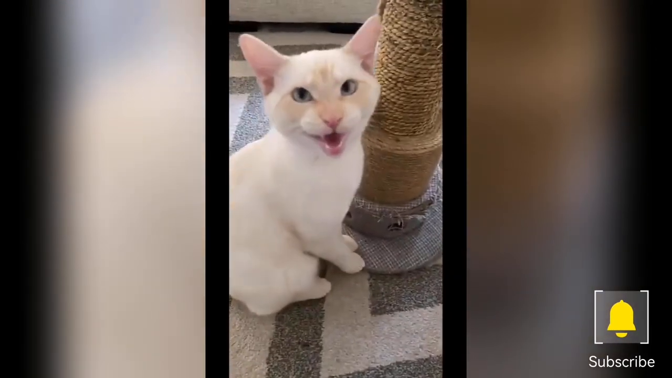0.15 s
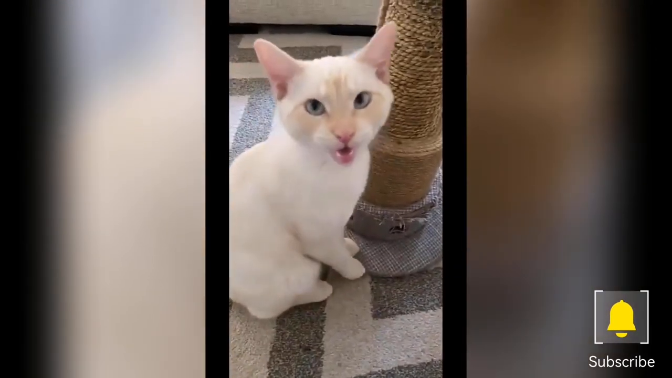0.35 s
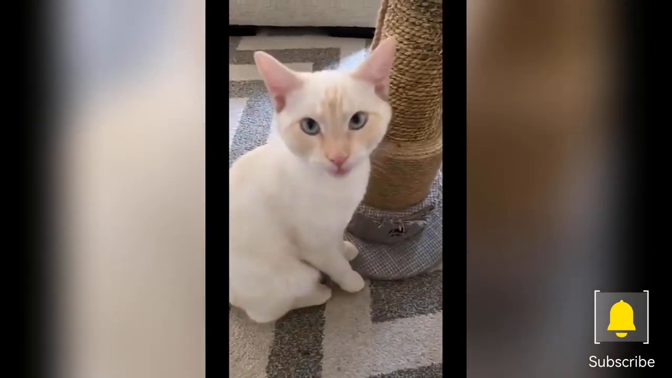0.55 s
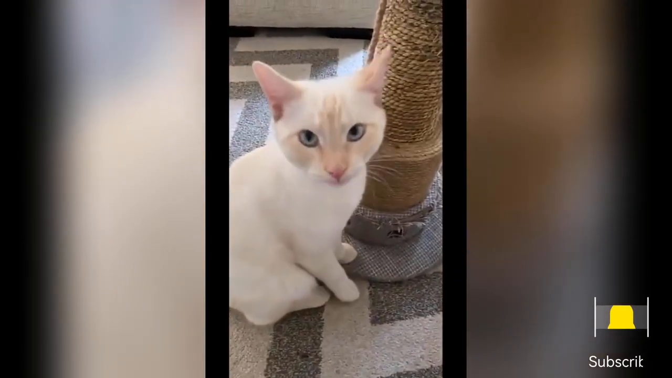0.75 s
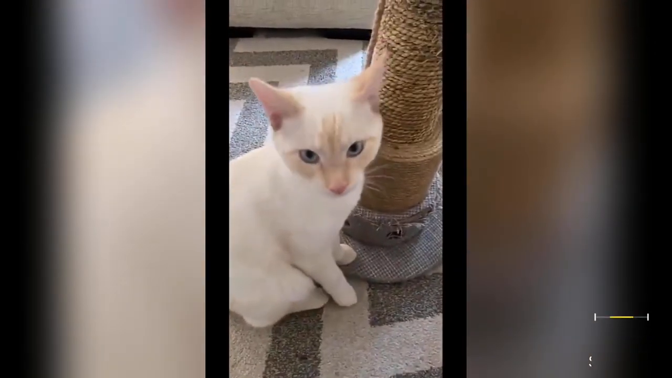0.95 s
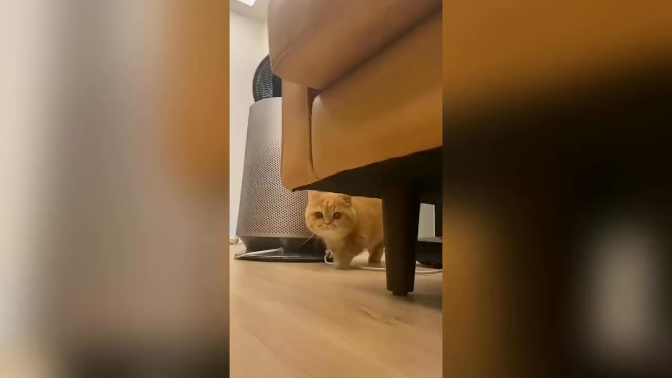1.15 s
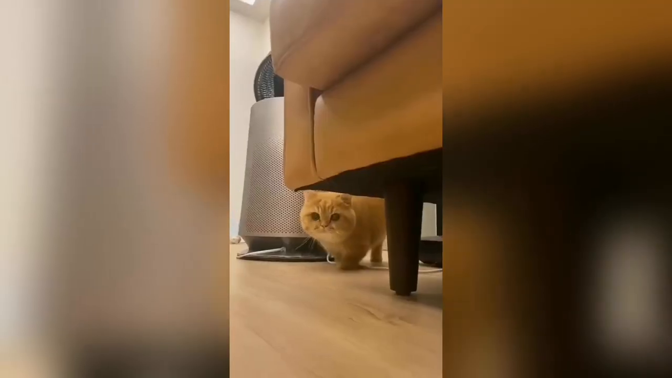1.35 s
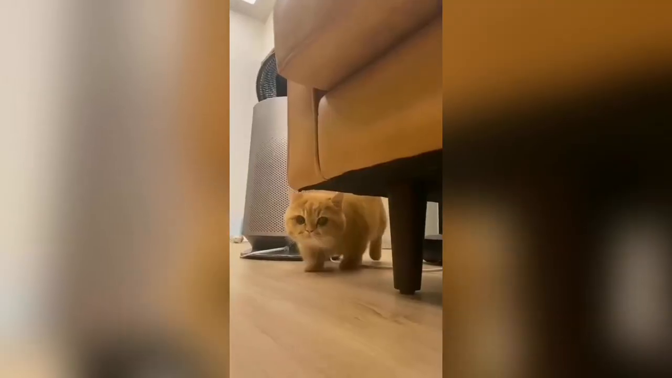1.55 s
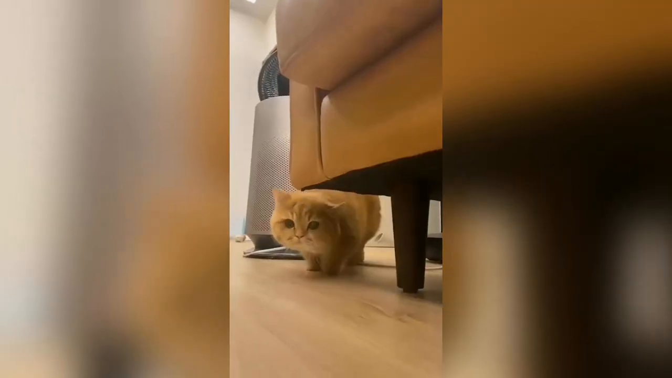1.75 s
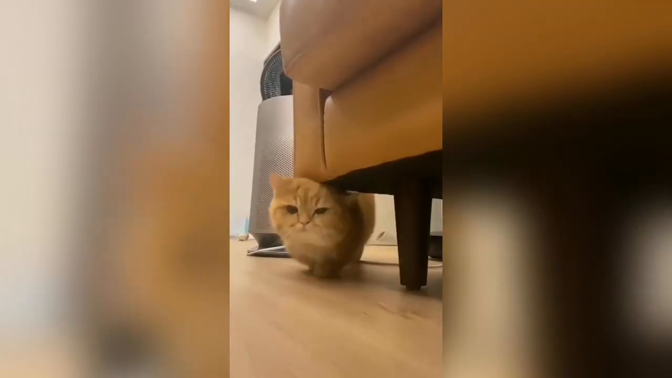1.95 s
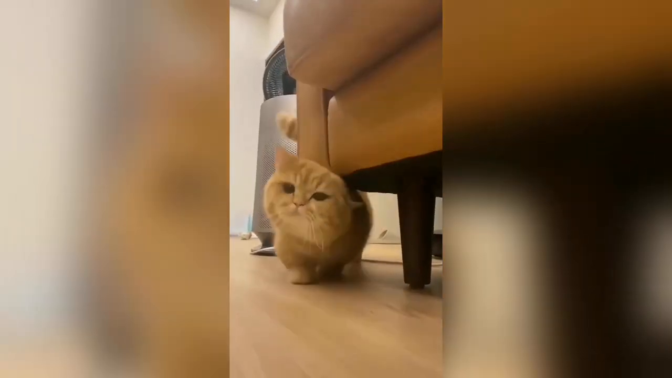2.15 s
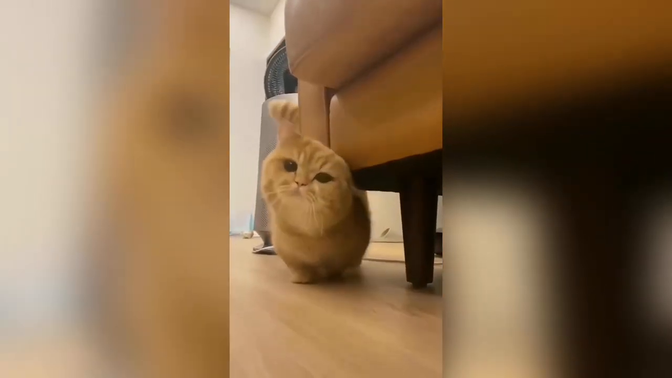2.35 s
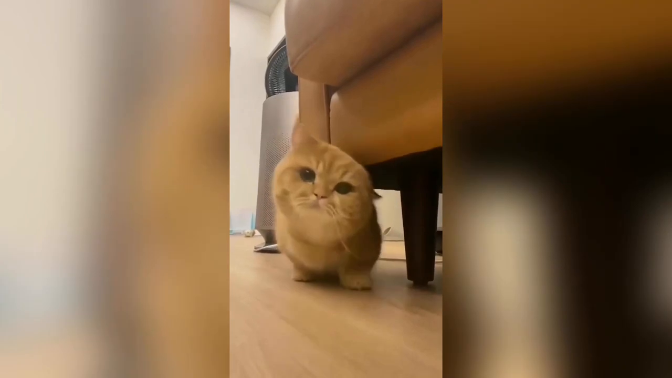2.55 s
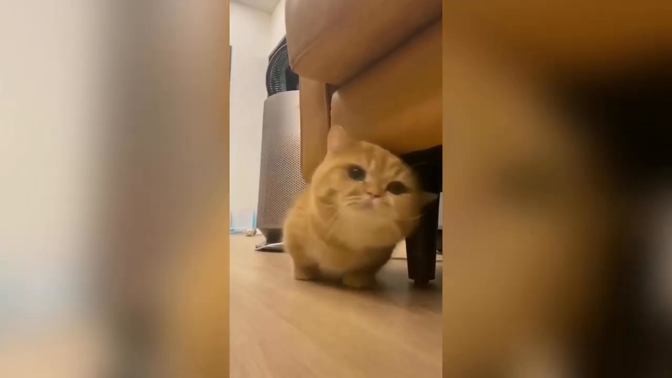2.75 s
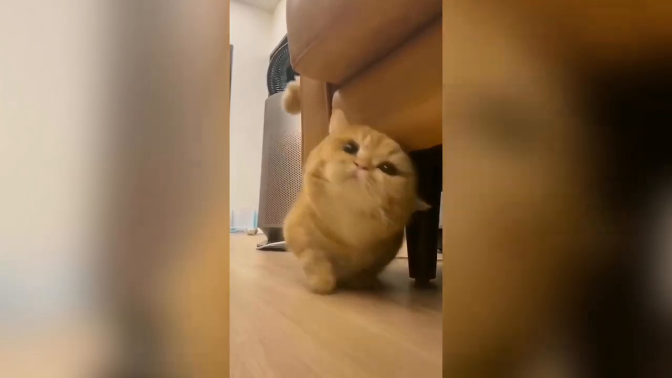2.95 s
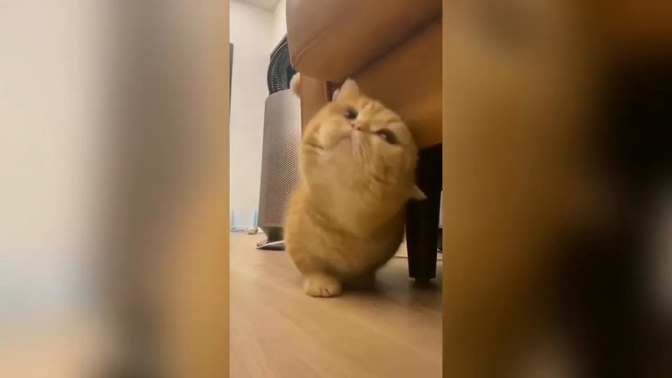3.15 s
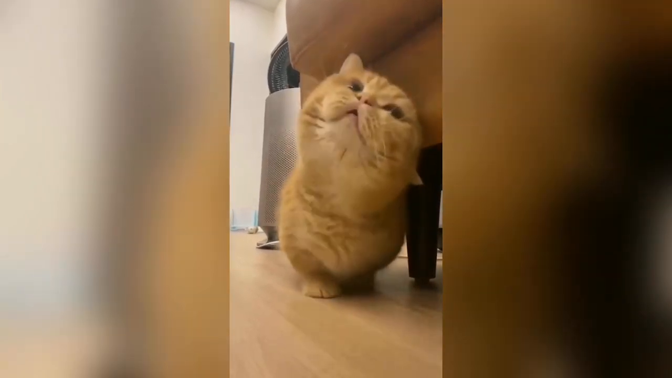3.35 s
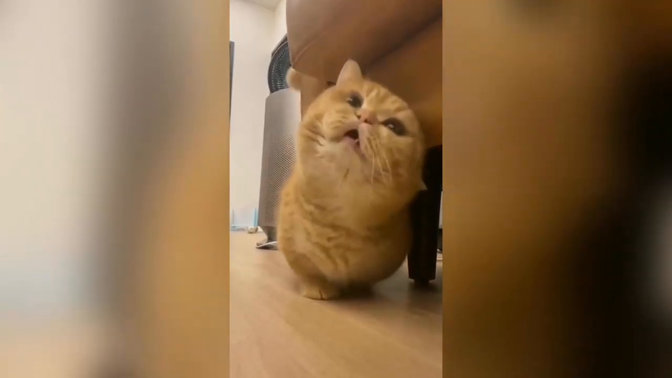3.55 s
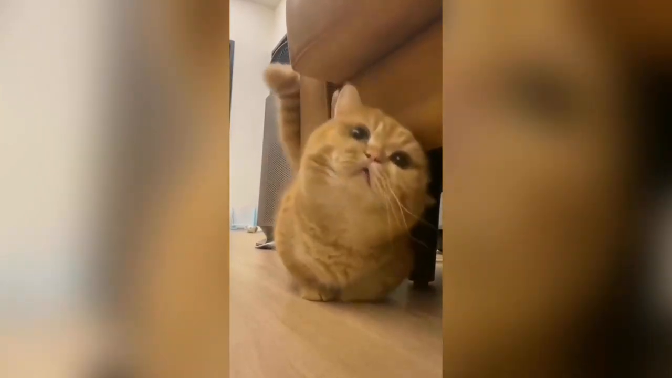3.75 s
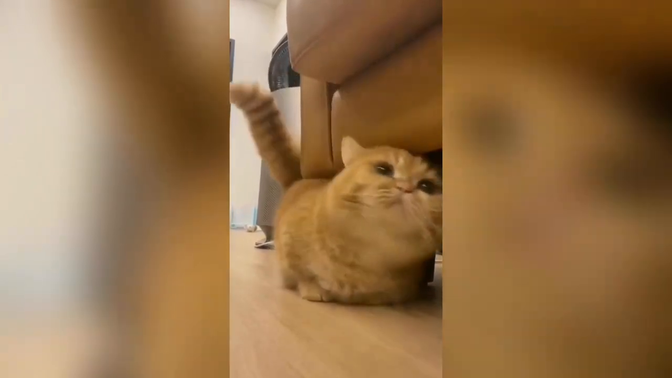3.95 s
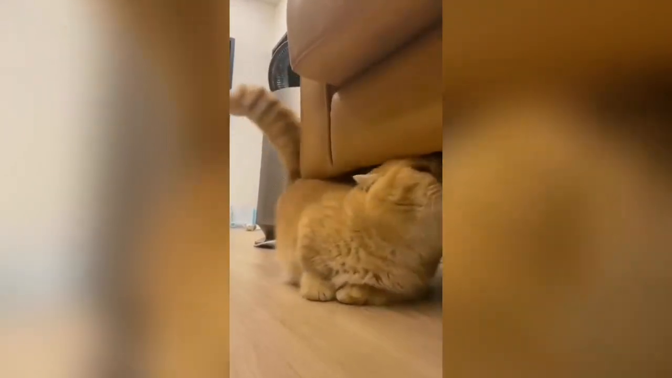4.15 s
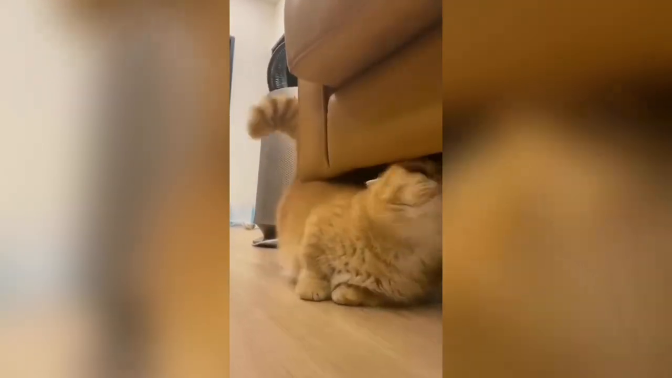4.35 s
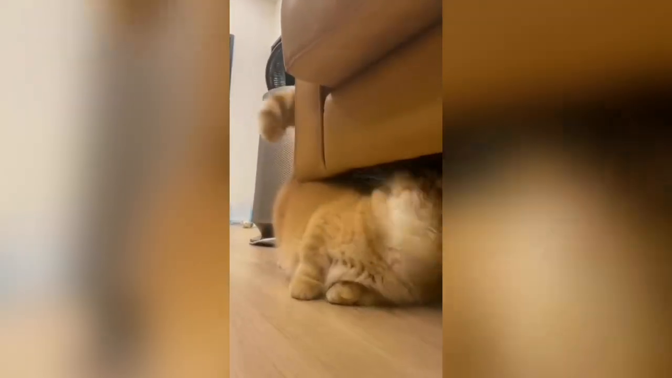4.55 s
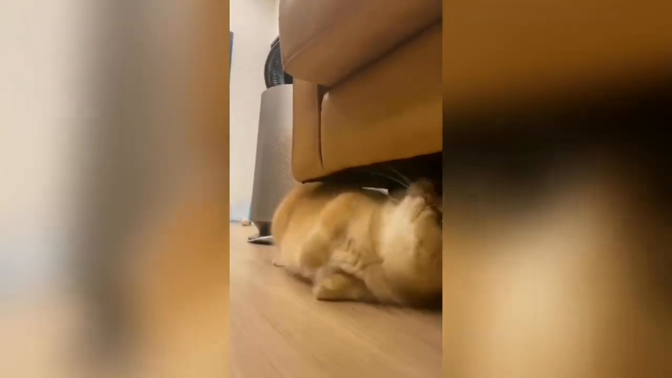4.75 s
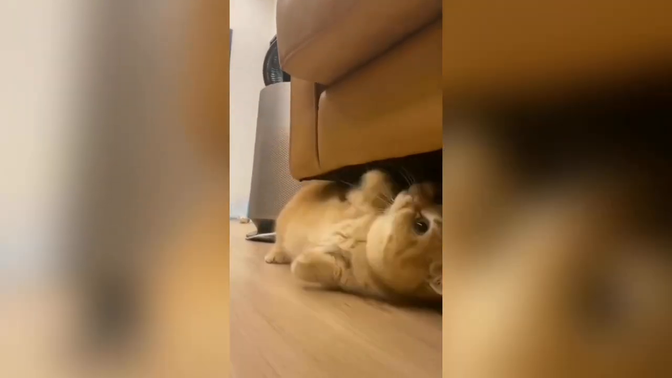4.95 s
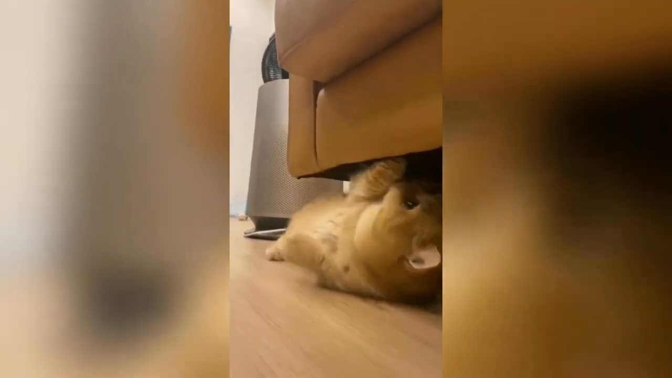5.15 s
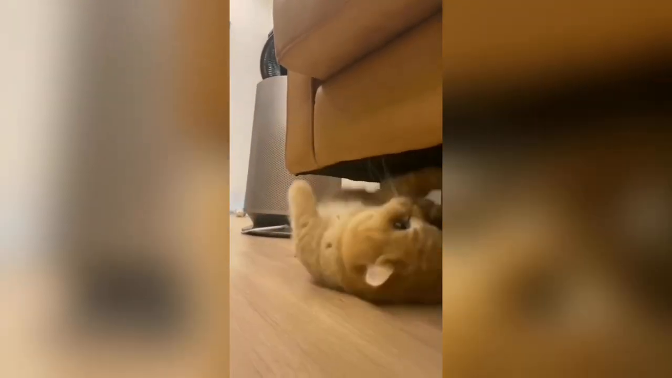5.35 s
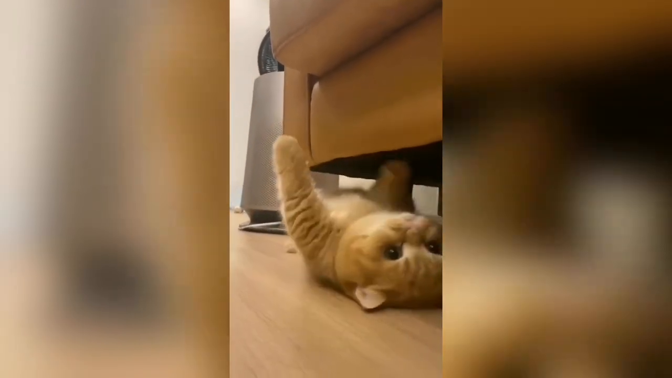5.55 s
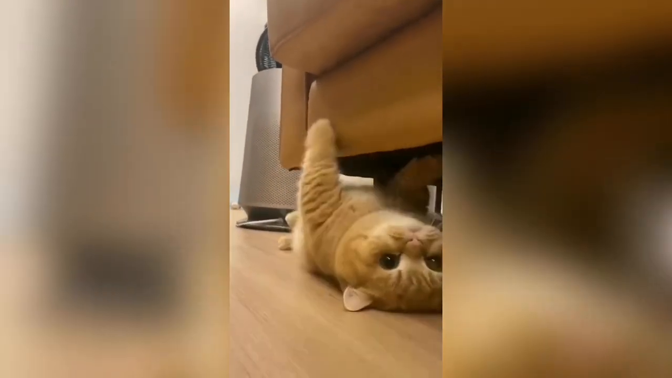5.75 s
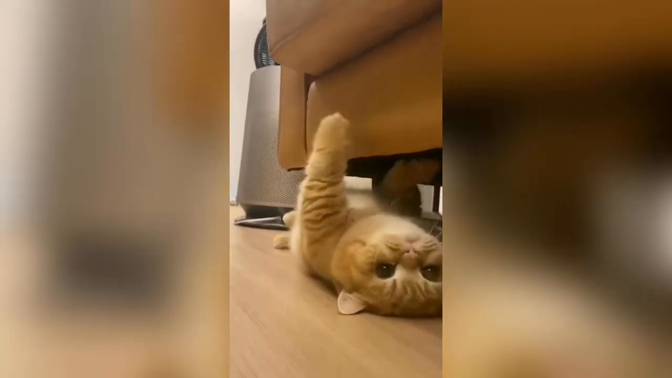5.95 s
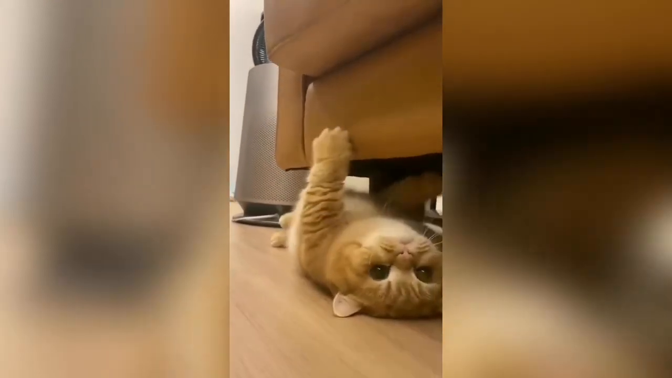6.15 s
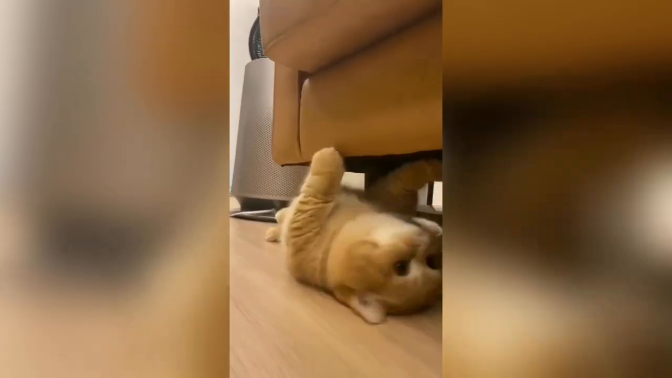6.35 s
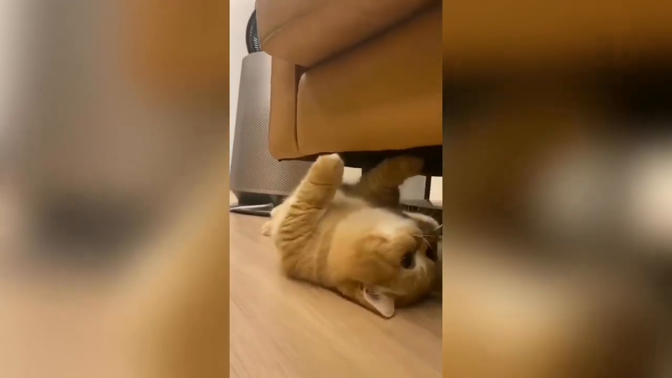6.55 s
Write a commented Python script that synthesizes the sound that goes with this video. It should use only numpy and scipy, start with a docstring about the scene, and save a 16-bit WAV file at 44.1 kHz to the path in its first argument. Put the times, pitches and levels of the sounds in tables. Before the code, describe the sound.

A cat gives a long raspy meow, then another mews softly and paws at a sofa over a low room hum.

```python
"""Indoors, two rooms with a low hum. In the first, a close cat's long meow cracks from a clear squeal
into a raspy, falling call: vocal-fold harmonics and pulsed breath through a closing mouth.
After a short silence, in the second room, another cat gives a clean, arched mew, then rolls on the
wooden floor against a sofa: fur rubs, claws tick and drag, padded paws set the furniture ringing."""
import sys
import numpy as np
from scipy import signal
from scipy.fft import rfft, irfft, next_fast_len
from scipy.io import wavfile

SR = 44100
rng = np.random.default_rng(int(sys.argv[2]) if len(sys.argv) > 2 else 0)


def store_pcm(level_fs):
    """Save levels as 16-bit WAV."""
    pcm = np.round(np.clip(level_fs, -1, 1) * 32767).astype(np.int16)
    wavfile.write(sys.argv[1], SR, np.atleast_2d(pcm).T)


N = 291060
T = np.arange(N) / SR
FFT_SIZE = next_fast_len(N + SR // 10)

# air spectrum per room: f/Hz, gain/dB
ROOM1_AIR = [(15, -33.5), (25, -12.5), (58, 0.5), (90, -14), (123, -8.5), (214, -22), (293, -23.5),
             (380, -21.5), (411, -20), (534, -30.5), (1370, -45.5), (1830, -54), (13000, -60.5)]
ROOM2_AIR = [(15, -58), (25, -22.5), (37, -6), (64, 2.5), (123, -5), (148, -4), (173, -9.5), (333, -9.5),
             (494, -22), (641, -20), (731, -28), (975, -33), (1330, -42), (1440, -44.5), (13000, -66.5)]
# hum lines per room: f/Hz, level/dB
ROOM1_HUM = [(61, -58), (116, -64)]
ROOM2_HUM = [(80.7, -57.5), (107.7, -58), (140.0, -60.5)]
# stereo width of air and friction: f/Hz, side over mid/dB
AIR_WIDTH = [(60, -37), (130, -30), (280, -15), (590, -3.5), (1300, 3), (12000, -2.5)]
RUB_WIDTH = [(100, -20), (360, -15.5), (700, -5), (4000, -11), (8000, 3)]

# strokes of body, pad on taut sofa, flank, claws: t/s, length/s, level/dB
BODY_RUBS = [(2.152, 0.11, -69), (2.34, 0.33, -68), (3.098, 0.34, -69), (3.423, 0.46, -65.5),
             (4.078, 0.38, -65.5), (5.26, 0.1, -61), (5.702, 0.066, -58.5), (5.99, 0.19, -63.5),
             (6.028, 0.027, -63.5), (6.149, 0.082, -60)]
PAD_SCRAPES = [(6.445, 0.3, -64.5), (6.52, 0.1, -68)]
FUR_BRUSHES = [(4.25, 0.7, -72.5)]
CLAW_DRAGS = [(3.11, 0.1, -74.5), (3.99, 0.18, -69.5), (4.92, 0.15, -71), (5.07, 0.11, -67),
              (5.382, 0.03, -68), (5.394, 0.035, -56.5), (5.411, 0.08, -56), (5.465, 0.06, -65),
              (5.493, 0.039, -59.5), (5.53, 0.056, -66.5), (5.56, 0.21, -78)]
# friction and click spectra: f/Hz, gain/dB
WOOD_EQ = [(150, -3), (500, 6.5), (1100, -6), (2400, -32), (4300, -17.5), (6500, -38), (12500, -27)]
SOFA_EQ = [(400, -10.5), (1200, 5.5), (2350, 5), (3000, 1), (4200, -2.5), (5500, -11.5), (6800, -23),
           (12500, -34.5)]
PAD_EQ = [(700, -17), (1400, -3), (1900, 2.5), (2500, -1), (2900, -13.5), (4000, -12), (5500, -41),
          (12000, -50)]
FUR_EQ = [(1000, -7.5), (2500, -9), (4000, -5), (5500, -4.5), (7000, -25), (12000, -18)]
CLAW_EQ = [(300, 10), (1500, 1.5), (2450, 2), (3200, -6.5), (4000, -4), (5500, -1), (6700, -7), (8200, -5),
           (9700, -5), (11000, -1), (12500, -8)]
CLICK_EQ = [(500, 13.5), (1400, 18), (2300, 9), (3600, 11), (5000, -20), (7000, -32), (12000, -38)]
# claw hits on sofa: t/s, level/dB
FABRIC_TICKS = [(4.726, -62), (5.204, -59), (5.3972, -49.5)]
FRAME_CLICKS = [(6.058, -41), (6.4098, -45)]
# paw landings: t/s, blow/dB, cutoff/Hz, slide length/s, slide/dB, sofa share/dB
PATS = [(5.422, -43, 504, 0.038, -56.5, -8), (5.729, -39, 385, 0.047, -50.5, -20),
        (5.74, -30.5, 476, 0.15, -51, -19.5), (6.058, -35, 3050, 0.1, -50, -6.5),
        (6.188, -34.5, 460, 0.18, -66, -10), (6.303, -47, 389, 0.054, -66.5, -9),
        (6.41, -38, 1090, 0.09, -56, 4)]
# furniture modes: f/Hz, level/dB, t60/s
FURNITURE_MODES = [(213, -8.5, 0.21), (296, -7, 0.13), (515, -6, 0.2), (541, 13, 0.019), (742, 5, 0.018),
                   (1070, 14.5, 0.0075), (1064, -8.5, 0.19), (2265, -10.5, 0.1), (2930, -17, 0.25),
                   (3530, -25, 0.13)]

# mew pitch arch: t/s, f/Hz
MEW_PITCH = [(3.56, 845), (3.6, 880), (3.65, 950), (3.7, 1042), (3.73, 1100), (3.765, 1138), (3.8, 1143),
             (3.825, 1157), (3.885, 1152), (3.92, 1128), (3.97, 1052), (4.03, 972), (4.07, 875)]
# throat gain on mew overtones: f/Hz, gain/dB
MEW_THROAT = [(1800, -4), (2280, 2.5), (3000, -9.5), (3450, -9), (4000, -20.5), (4600, -27.5),
              (5400, -20.5), (5800, -27), (6900, -35), (7600, -67.5), (11500, -52)]
# mouth opening, on the octave and on higher overtones: t/s, gain/dB
MEW_OCTAVE = [(3.64, -50.5), (3.66, -21), (3.676, -21), (3.688, -33), (3.702, -9), (3.735, -8),
              (3.775, -1.5), (3.81, -1.5), (3.832, -6.5), (3.857, -1.5), (3.882, -8.5), (3.912, -1.5),
              (3.945, -7.5), (3.964, -3.5), (3.976, -12.5), (3.995, -7), (4.025, -23.5), (4.06, -16)]
MEW_OPENING = [(3.61, -52), (3.665, -20.5), (3.69, -15.5), (3.71, -4.5), (3.78, 0), (3.83, -2), (3.88, -4),
               (3.915, -2.5), (3.95, -9.5), (3.98, -19), (4.03, -37)]

# meow squeal, crack, fall, last flick: t/s, f/Hz
MEOW_PITCH = [(0.0, 1106), (0.03, 1114), (0.044, 1078), (0.05, 990), (0.06, 935), (0.063, 845),
              (0.073, 815), (0.081, 875), (0.095, 900), (0.146, 855), (0.162, 882), (0.3, 818), (0.42, 769),
              (0.63, 745), (0.72, 707), (0.797, 702), (0.802, 808), (0.825, 815)]
# meow's overall tone colour, static peaks and dips: f/Hz, gain/dB
MEOW_EQ = [(300, -18.5), (720, -2), (1150, -3.5), (1700, -5), (2450, -9.5), (3000, -26), (3400, -15),
           (3800, -14.5), (4150, -18), (4500, -13.5), (5100, -18), (5450, -19.5), (6100, -10), (6850, -5),
           (7300, -25), (7800, -21), (8700, -22), (9600, -28), (10300, -42.5), (12700, -38.5)]
# closing mouth's resonance: t/s, f/Hz, peak/dB
MEOW_MOUTH = [(.028, 2370, 23.5), (.038, 2260, 18.5), (.046, 2260, 24.5), (.058, 2300, 20.5),
              (.066, 2670, 21), (.19, 2480, 20), (.28, 2160, 22.5), (.38, 1820, 14), (.54, 1600, 13.5),
              (.665, 1470, 12.5), (.72, 1590, 7.5), (.79, 1510, 5.5), (.806, 900, 13.5)]
# voice breaks: t/s, roughness/dB, recovery/(dB/s)
MEOW_BREAKS = [(0.056, -3, 100), (0.125, -12, 75), (0.356, -15, 200), (0.64, -22, 120), (.81, -10, 14)]
# breath spectra (rasp at source, mouth hiss, closing rasp): f/Hz, gain/dB
RASP_EQ = [(400, -22), (1350, -26), (2150, -4), (2600, -8), (3000, -16), (3700, -12), (4100, -1), (4400, 2),
           (5200, -5), (6400, -2), (7300, -6), (8700, 3), (12000, 4)]
HISS_EQ = [(600, -24), (1100, -20), (1900, -25), (3200, -36), (4200, -34), (5200, -26), (5850, -17),
           (6150, -1), (6500, 1), (6900, 0), (7200, -25), (7900, -16), (9000, -19), (10300, -32),
           (12500, -24)]
END_RASP_EQ = [(700, -12.5), (1500, -2), (2500, 1), (3800, -1.5), (4700, -12.5), (6500, -6.5), (9000, -9.5),
               (12500, -14.5)]
# hiss envelope: t/s, level/dB
HISS_LEVEL = [(.03, -72), (.045, -50), (.12, -55), (.28, -55), (.35, -49), (.44, -57), (.54, -54),
              (.65, -52), (.71, -58), (.76, -56), (.81, -61), (.83, -74), (.88, -92), (.95, -140)]
# closing rasp: t/s, length/s, level/dB
END_RASP_STROKE = [(.795, 0.11, -65)]
# left mic against right: f/Hz, phase/rad
MIC_PHASE = [(300, 0), (1400, -.4), (2240, -.5), (2670, -1), (3100, -2), (4500, -3.6), (5500, -5.6),
             (6800, -6.3), (12000, -6.3)]
# left mic against right: f/Hz, gain/dB
MIC_BALANCE = [(300, 6.5), (750, 3.5), (1100, 5.5), (1520, 1.5), (2200, 1), (3800, 2), (7000, -0.5)]


def undb(db):
    """Decibels to gain."""
    return 10 ** (np.asarray(db) / 20)


def unit(x):
    """Scale to rms 1."""
    return x / np.sqrt(np.mean(x ** 2))


def since(start_s):
    """Seconds after start_s, zero before."""
    return np.maximum(T - start_s, 0)


def curves(table, t=T):
    """Table columns interpolated at times t."""
    times_s, *columns = np.transpose(table)
    return [np.interp(t, times_s, column) for column in columns]


def spectrum_db(eq, f):
    """Spectrum interpolated over log frequency."""
    hz, db = np.transpose(eq)
    return np.interp(np.log(f + 1), np.log(hz), db)


def colour(x, eq):
    """Filter x by a spectrum."""
    gain = undb(spectrum_db(eq, np.fft.rfftfreq(FFT_SIZE, 1 / SR)))
    return irfft(rfft(x, FFT_SIZE) * gain, FFT_SIZE)[..., :N]


def noise(eq):
    """Coloured noise, rms 1."""
    return unit(colour(rng.standard_normal(N), eq))


def stereo_noise(eq, width):
    """Independent mid and side noise as left and right."""
    return noise(eq) + np.array([[1], [-1]]) * colour(noise(eq), width)


def wander(rate_hz):
    """Smooth random drift, rms 1."""
    knots = rng.standard_normal(N // 8)
    return unit(np.interp(T * rate_hz, np.arange(len(knots)), knots))


def swells(strokes):
    """Summed envelope of fast-rising, fading strokes."""
    shape = [0.0031, 0.9, 0.48, 0.0069]
    return sum(undb(db) * np.interp(T, start_s + length_s * np.array([0, .25, .5, 1]), shape)
               for start_s, length_s, db in strokes)


def reverb(x, t60_s, wet_db, damp_hz):
    """Direct sound plus a low-passed stereo tail."""
    t = T[:SR // 2]
    tail = rng.standard_normal((2, len(t))) * undb(-60 * t / t60_s) * (t > .003)
    tail = signal.lfilter(*signal.butter(2, damp_hz, fs=SR), tail)
    tail /= np.sqrt(np.sum(tail ** 2, axis=1, keepdims=True))
    return x + undb(wet_db) * signal.fftconvolve(np.atleast_2d(x), tail, axes=1)[:, :N]


def mic_pair(x):
    """Two mics on one case: phase offset, near side louder."""
    f = np.fft.rfftfreq(FFT_SIZE, 1 / SR)
    phase_rad, = curves(MIC_PHASE, f)
    left_over_right = undb(spectrum_db(MIC_BALANCE, f)) * np.exp(1j * phase_rad)
    response = np.array([left_over_right, np.ones(len(f))]) / np.sqrt(np.abs(left_over_right))
    return irfft(rfft(x, FFT_SIZE) * response, FFT_SIZE)[:, :N]


def room_tone(air, hum, air_db, waver_db, drift_hz):
    """Indoor air rumble and wavering hum lines."""
    tone = stereo_noise(air, AIR_WIDTH) * undb(air_db + .6 * wander(9.7))
    for hz, db in hum:
        gain = np.sqrt(2) * undb(db + waver_db * wander(5.8))
        tone += gain * np.sin(2 * np.pi * np.cumsum(hz + drift_hz * wander(12)) / SR)
    return tone


def rubs(grain_db=1.5, body_sofa_db=-8.5, fur_lead_s=.004):
    """Fur and pads slide unevenly on wood and upholstery, at body shifts and pats."""
    strokes = [(*rub, body_sofa_db) for rub in BODY_RUBS]
    strokes += [(s - fur_lead_s, length_s, db, sofa_db) for s, _, _, length_s, db, sofa_db in PATS]
    on_wood = [(s, length_s, db) for s, length_s, db, _ in strokes]
    on_sofa = [(s, length_s, db + sofa_db) for s, length_s, db, sofa_db in strokes]
    surfaces = [(on_wood, WOOD_EQ), (on_sofa, SOFA_EQ), (PAD_SCRAPES, PAD_EQ), (FUR_BRUSHES, FUR_EQ)]
    swish = sum(swells(moves) * stereo_noise(eq, RUB_WIDTH) for moves, eq in surfaces)
    return swish * unit(undb(grain_db * wander(200)))


def claws(catches_per_s=7000, grip_db=2.5):
    """Claws tick on fabric, drag in tiny catches and click on the sofa frame."""
    def pings(hits, decay_s):
        return sum(undb(db) * (T >= s) * np.exp(-since(s) / decay_s) for s, db in hits)

    catches = (rng.random(N) < catches_per_s / SR) * rng.standard_normal(N)
    catches *= undb(grip_db * wander(160))
    drags = unit(colour(catches, CLAW_EQ)) * swells(CLAW_DRAGS)
    ticks = noise(CLAW_EQ) * pings(FABRIC_TICKS, decay_s=.0026)
    clicks = noise(CLICK_EQ) * pings(FRAME_CLICKS, decay_s=.0009)
    return reverb(drags + ticks + clicks, t60_s=.13, wet_db=-2, damp_hz=13500)


def paw_taps(contact_t60_s=.013, ring_db=-6, detune=.0243):
    """Padded blows ring the furniture: toes first, then the softer, duller pad."""
    taps, t = np.zeros(N + SR), T[:SR // 4]
    for start_s, db, toe_cutoff_hz, *_ in PATS:
        for lag_s, trim_db, dulling in [(0, 0, 1), (.006, -7.5, .67)]:
            cutoff_hz = toe_cutoff_hz * dulling
            contact = rng.standard_normal(len(t)) * undb(-60 * t / contact_t60_s)
            ring = 0
            for k, (hz, mode_db, t60_s) in enumerate(FURNITURE_MODES):
                mode_hz = hz * (1 + detune * rng.standard_normal())
                ring += (-1) ** k * undb(mode_db - 60 * t / t60_s) * np.sin(2 * np.pi * mode_hz * t)
            blow = signal.lfilter(*signal.butter(3, cutoff_hz, fs=SR), contact + undb(ring_db) * ring)
            blow *= 1 - np.exp(-t * cutoff_hz)  # softer pad, slower rise
            start = int((start_s + lag_s) * SR)
            taps[start:start + len(t)] += undb(db + trim_db) * blow
    return reverb(taps[:N], t60_s=.15, wet_db=-23, damp_hz=5000)


def mew(start_s=3.558, attack_s=.087, release_s=.062, end_s=4.076, level_db=-37, balance_db=-2.6):
    """Arched pitch; overtones bloom as the mouth opens, the highest last in and first out."""
    jitter, steepening, flutter_db = .0016, .18, 1.5
    hz, = curves(MEW_PITCH)
    octave_db, = curves(MEW_OCTAVE)
    opening_db, = curves(MEW_OPENING)
    phase = 2 * np.pi * np.cumsum(hz * (1 + jitter * (wander(320) + wander(60)))) / SR

    def overtone(ratio, db):
        return undb(spectrum_db(MEW_THROAT, ratio * hz) + db) * np.sin(ratio * phase)

    voice = np.sin(phase) + overtone(1.995, octave_db)
    for rank, k in enumerate(range(3, 11)):
        flicker_db = flutter_db * min(rank + .5, 2) * wander(45)
        voice += overtone(k, opening_db * (1 + steepening * rank) + flicker_db)
    envelope = np.clip(np.minimum((T - start_s) / attack_s, (end_s - T) / release_s), 0, 1)
    voice *= np.sqrt(2) * undb(level_db) * envelope
    pan = undb(np.array([[balance_db], [-balance_db]]) / 2)
    return reverb(voice, t60_s=.3, wet_db=-21, damp_hz=4000) * pan


def mouth_snap(start_s=.828, length_s=.014, from_hz=2950, to_hz=2380, squeak_db=-55):
    """Toneless rasp and a tiny falling squeak as the mouth shuts on the meow."""
    progress = np.clip((T - start_s) / length_s, 0, 1)
    phase = 2 * np.pi * np.cumsum(from_hz + (to_hz - from_hz) * progress) / SR
    squeak = np.sqrt(2) * undb(squeak_db) * np.sin(np.pi * progress) ** 2 * np.sin(phase)
    rasp = noise(END_RASP_EQ) * swells(END_RASP_STROKE)
    return reverb(rasp + squeak, t60_s=.15, wet_db=-11, damp_hz=9060)


def roughness(clear_db=-29, rise_db_per_s=800):
    """Each voice break flares up and heals."""
    breaks = sum(undb(db - rise_db_per_s * np.maximum(s - T, 0) - recovery_db_per_s * since(s))
                 for s, db, recovery_db_per_s in MEOW_BREAKS)
    return np.hypot(undb(clear_db), breaks)


def vocal_folds(rough, crack_s=.04, crack_rise_s=.017, jitter=.02, quaver=.003):
    """Harmonic tone and its phase; the rougher the voice, the more unequal its cycles."""
    lag_rad, stray_rad, shimmer_db = .5, .014, .45
    fray, alternation, breakup = .3, .25, .58
    hz, = curves(MEOW_PITCH)
    cracked = np.clip(since(crack_s) / crack_rise_s, 0, 1)
    wobble = cracked * (jitter * rough * wander(400) + quaver * wander(220))
    phase = 2 * np.pi * np.cumsum(hz * (1 + wobble)) / SR
    tone = 0
    for k in range(1, 18):
        # throat delays high harmonics, smearing each pulse
        offset_rad = stray_rad * k * cracked * wander(240) - lag_rad * k ** 2
        gain = (1 + fray * rough * wander(260)) * undb(shimmer_db * min(k, 8) * wander(40))
        tone += np.sqrt(2) * gain * np.cos(k * phase + offset_rad)
    tone *= 1 + alternation * rough * wander(200) * np.cos(phase / 2)  # strong and weak cycles
    return tone / (1 + breakup * rough ** 2), phase


def meow_timbre(source, half_width_hz=380, upper_ratio=2, upper_share=.36):
    """Overall tone colour plus two resonances that fall as the mouth closes."""
    f, t, frames = signal.stft(source, SR, nperseg=256, noverlap=192)
    mouth_hz, peak_db = curves(MEOW_MOUTH, t)
    gain_db = spectrum_db(MEOW_EQ, f)[:, None]
    for ratio, share in [(1, 1), (upper_ratio, upper_share)]:
        detuning = (f[:, None] - ratio * mouth_hz) / half_width_hz
        gain_db = gain_db + share * peak_db / (1 + detuning ** 2)
    return signal.istft(frames * undb(gain_db), SR, nperseg=256, noverlap=192)[1][:N]


def meow(source_db=-37.5, rasp_db=9, creak_db=3, puff_depth=.6, scatter_hz=2900):
    """Folds and once-a-cycle puffs of rasp sound through the mouth; air hisses past."""
    sag_db = 13 * T  # air runs out
    closing_db = 50 * since(.65) + 1300 * since(.816)  # mouth shuts, voice stops
    rough = roughness()
    tone, phase = vocal_folds(rough)
    puffs = 1 + puff_depth * np.cos(phase)
    rasp = undb(rasp_db + creak_db * wander(260)) * noise(RASP_EQ) * rough * puffs
    voice = meow_timbre((tone + rasp) * undb(source_db - sag_db - closing_db))
    hiss_db, = curves(HISS_LEVEL)
    voice += noise(HISS_EQ) * puffs * undb(hiss_db)
    # nearby objects scatter the treble; carpet keeps the room nearly dry
    treble = signal.sosfilt(signal.butter(4, scatter_hz, "high", fs=SR, output="sos"), voice)
    scattered = reverb(treble, t60_s=.05, wet_db=-5, damp_hz=13000) - treble
    return reverb(mic_pair(voice) + scattered, t60_s=.15, wet_db=-19, damp_hz=9000)


def scene(room1_end_s=1.21, room2_start_s=1.461):
    """First cat's room, short silence, second cat's room."""
    room1 = meow() + mouth_snap()
    room1 += room_tone(ROOM1_AIR, ROOM1_HUM, air_db=-52.5, waver_db=1.5, drift_hz=3.9)
    room2 = mew() + paw_taps() + claws() + rubs()
    room2 += room_tone(ROOM2_AIR, ROOM2_HUM, air_db=-50.5, waver_db=1.5, drift_hz=1.953)
    fade_out = np.clip((room1_end_s - T) / .0041, 0, 1)
    fade_in = np.clip((T - room2_start_s) / .00131, 0, 1)
    return room1 * fade_out + room2 * fade_in


def record(dry, low_cut_hz=45, high_cut_hz=12800):
    """Mic low cut, then a steep low-pass: no treble above about 13 kHz."""
    lean = signal.sosfilt(signal.butter(4, low_cut_hz, "high", fs=SR, output="sos"), dry)
    return signal.sosfilt(signal.ellip(8, .2, 70, high_cut_hz, fs=SR, output="sos"), lean)


dry = scene()
out = record(dry)
store_pcm(out)
```